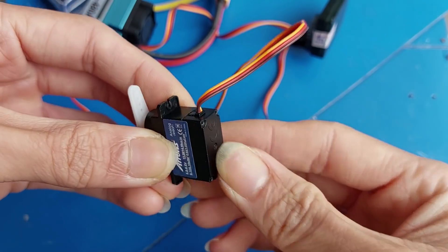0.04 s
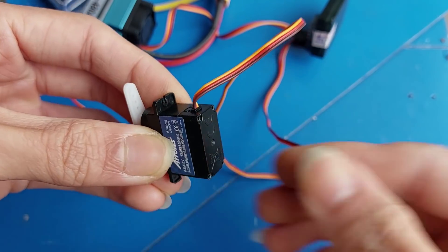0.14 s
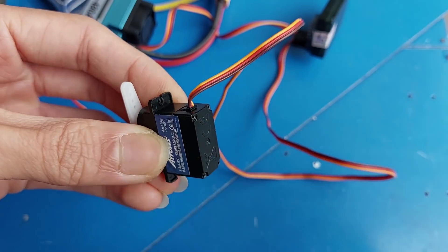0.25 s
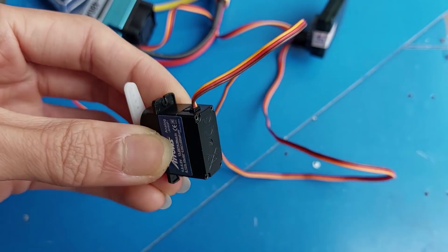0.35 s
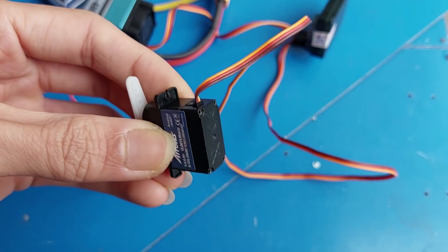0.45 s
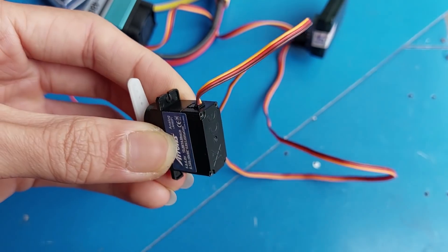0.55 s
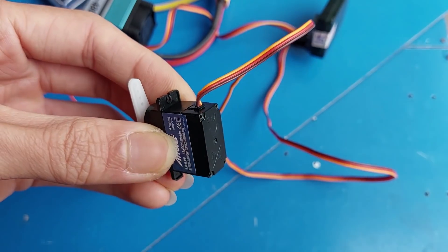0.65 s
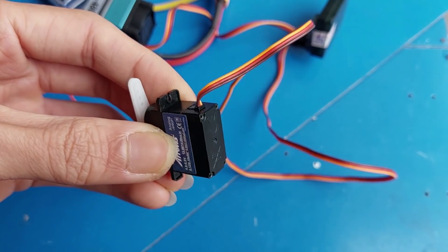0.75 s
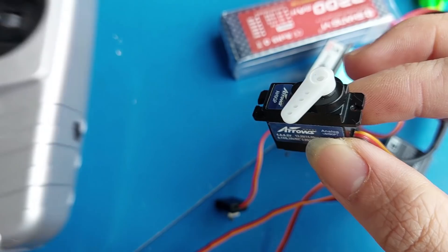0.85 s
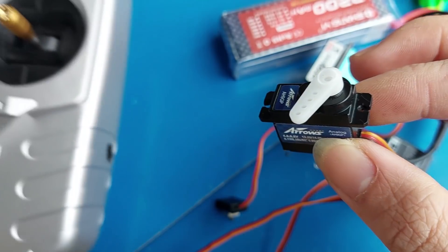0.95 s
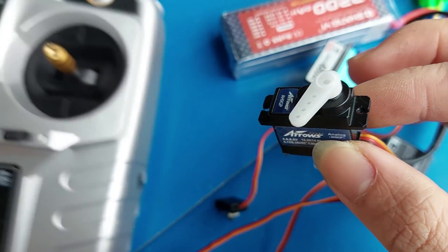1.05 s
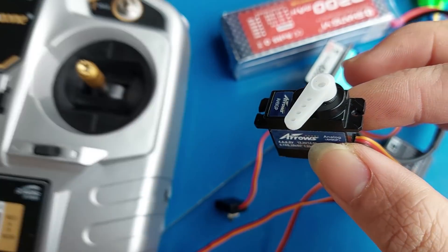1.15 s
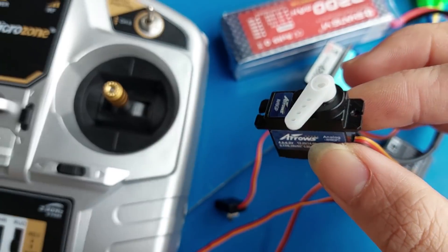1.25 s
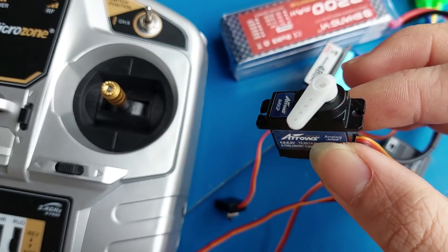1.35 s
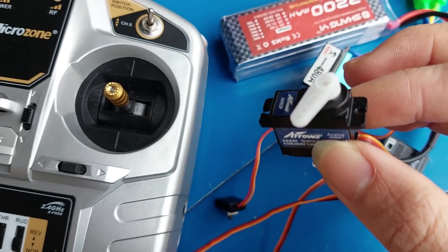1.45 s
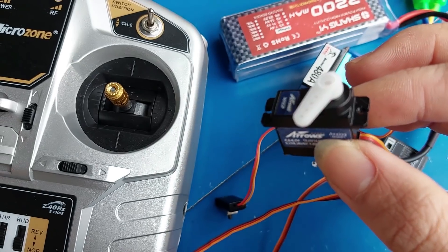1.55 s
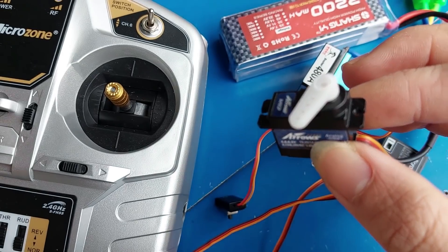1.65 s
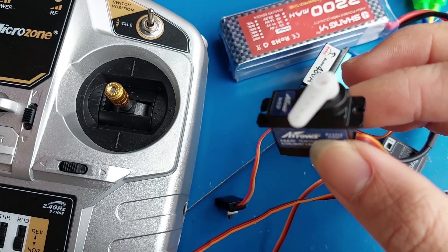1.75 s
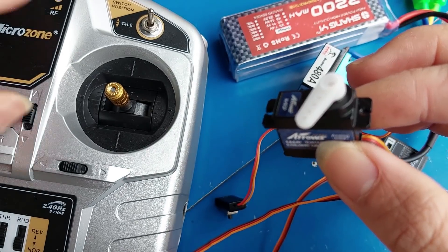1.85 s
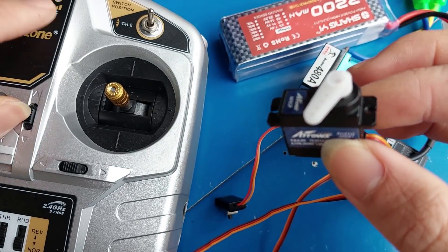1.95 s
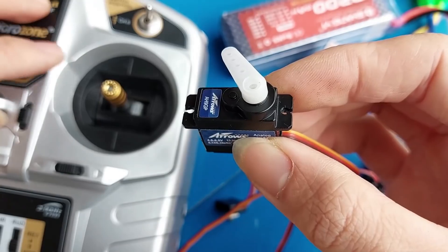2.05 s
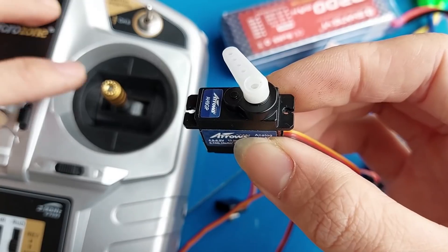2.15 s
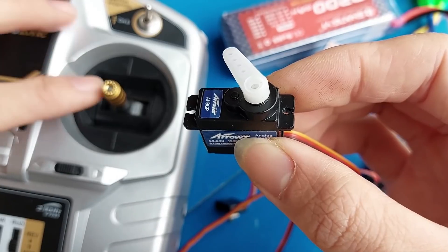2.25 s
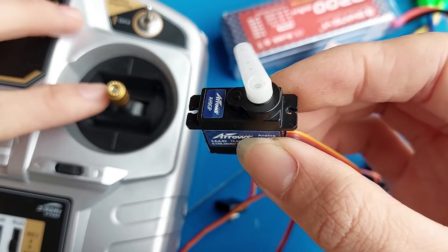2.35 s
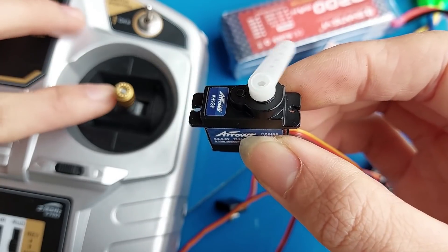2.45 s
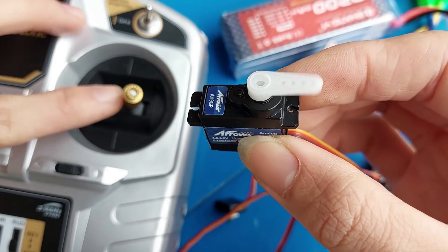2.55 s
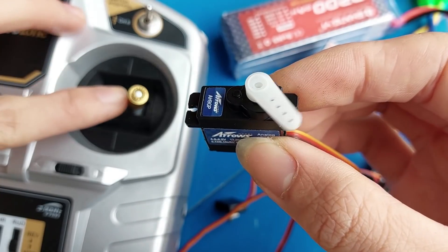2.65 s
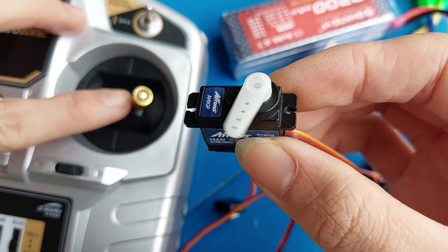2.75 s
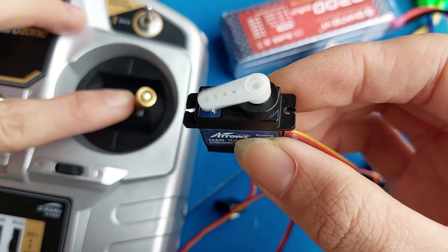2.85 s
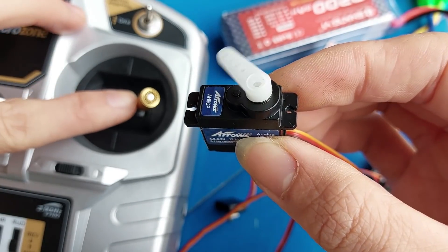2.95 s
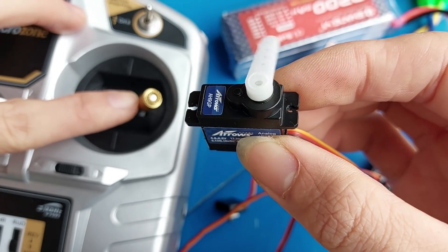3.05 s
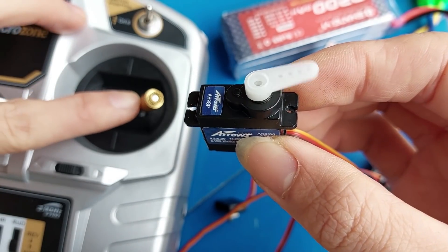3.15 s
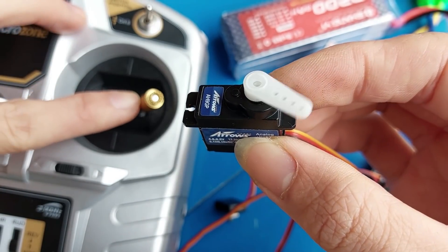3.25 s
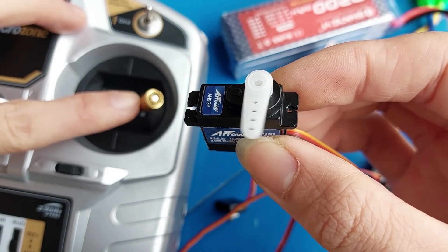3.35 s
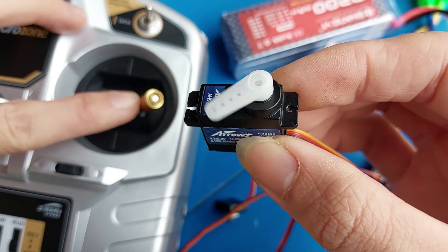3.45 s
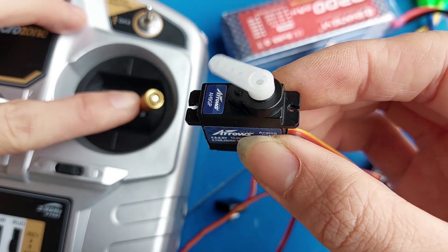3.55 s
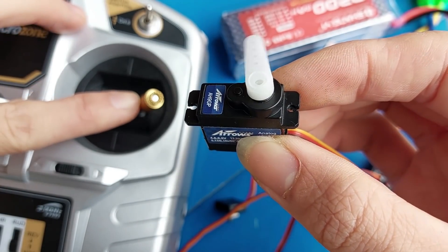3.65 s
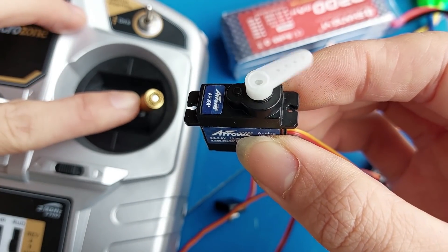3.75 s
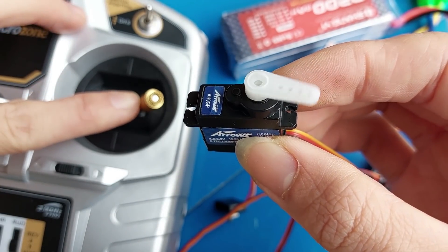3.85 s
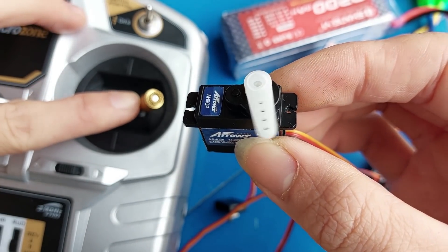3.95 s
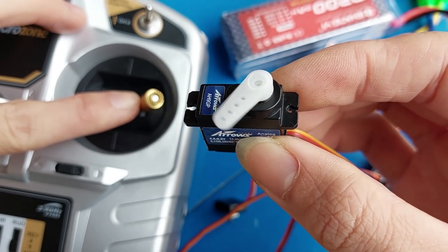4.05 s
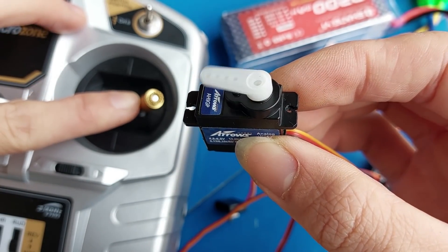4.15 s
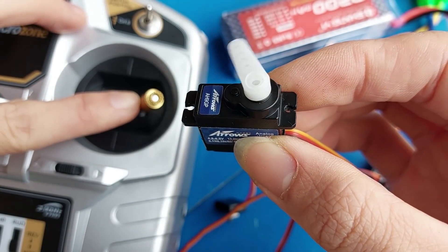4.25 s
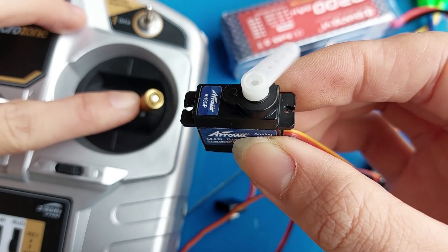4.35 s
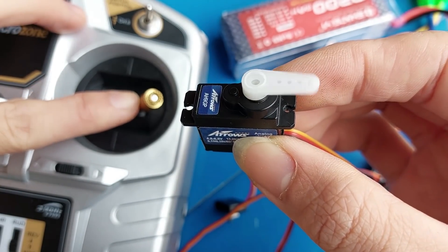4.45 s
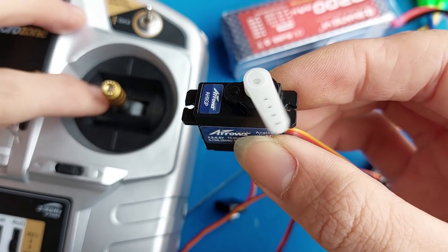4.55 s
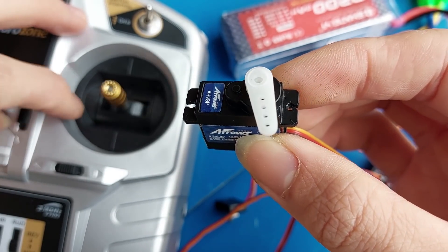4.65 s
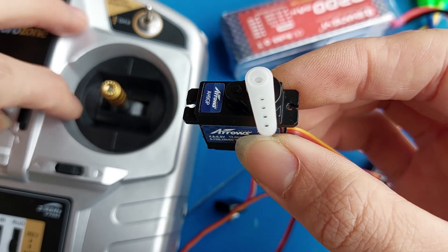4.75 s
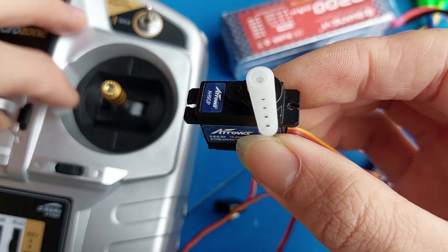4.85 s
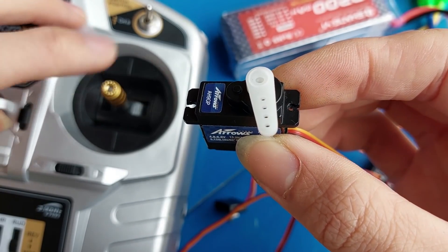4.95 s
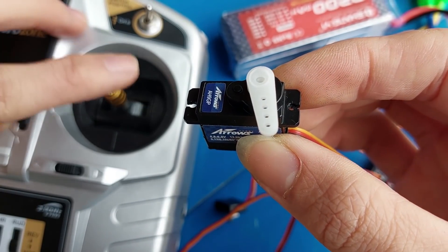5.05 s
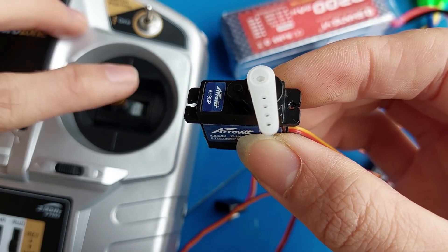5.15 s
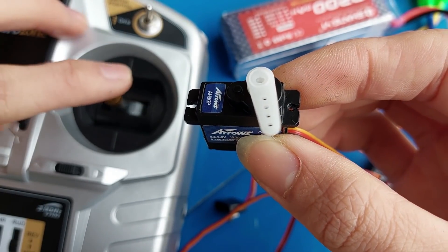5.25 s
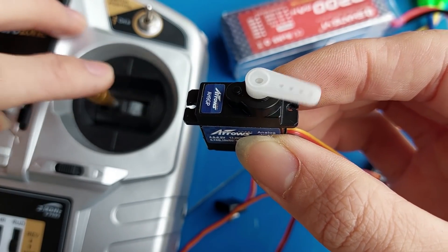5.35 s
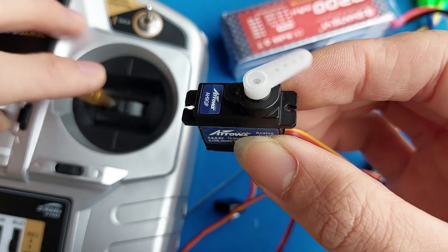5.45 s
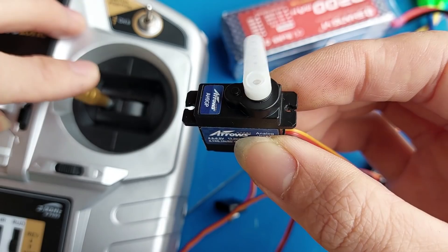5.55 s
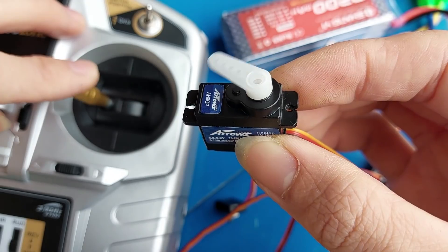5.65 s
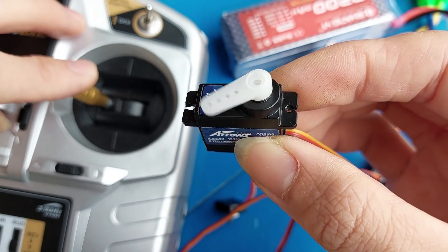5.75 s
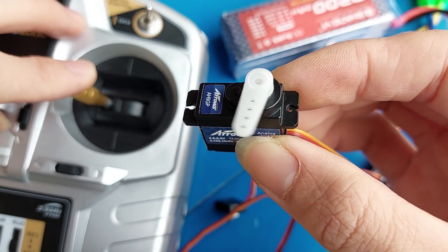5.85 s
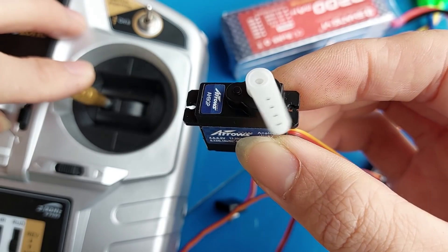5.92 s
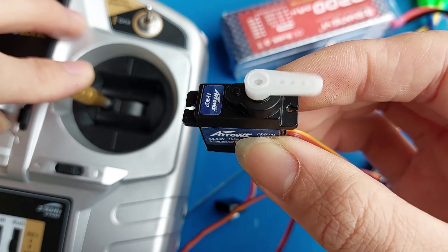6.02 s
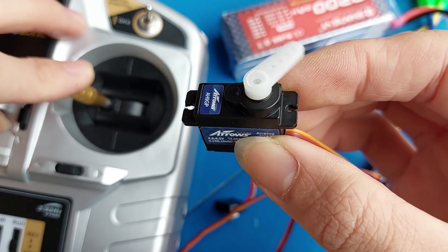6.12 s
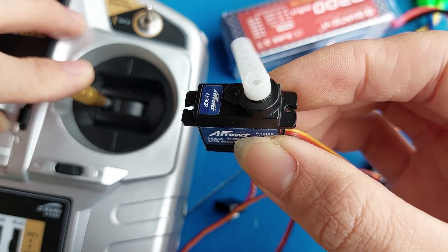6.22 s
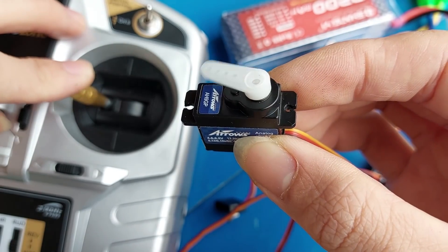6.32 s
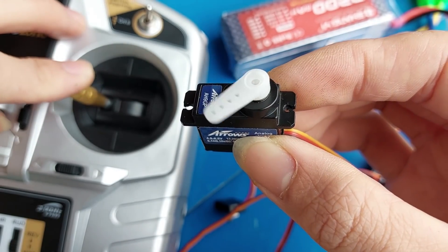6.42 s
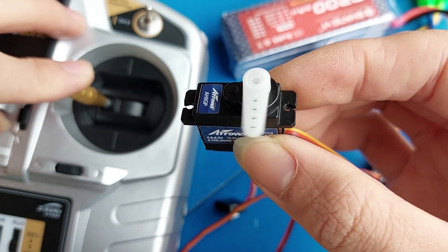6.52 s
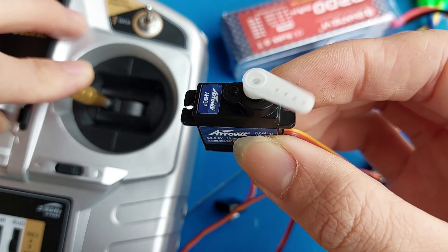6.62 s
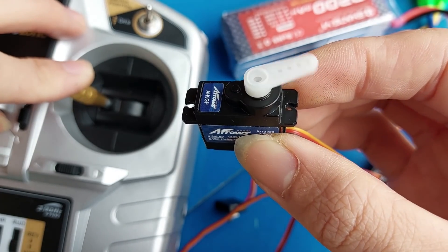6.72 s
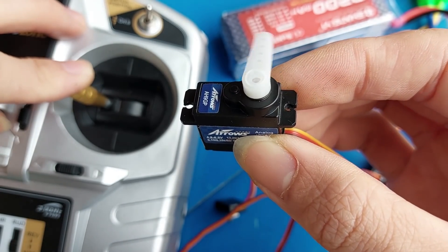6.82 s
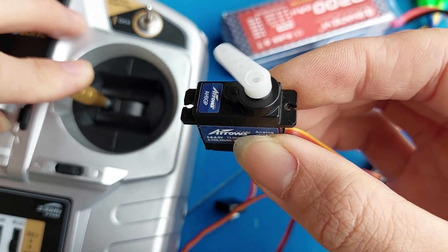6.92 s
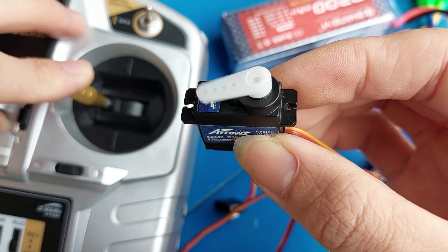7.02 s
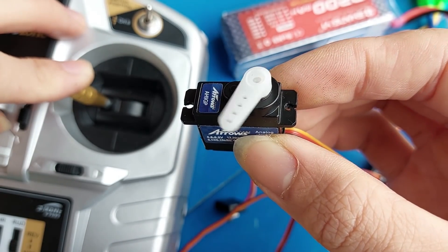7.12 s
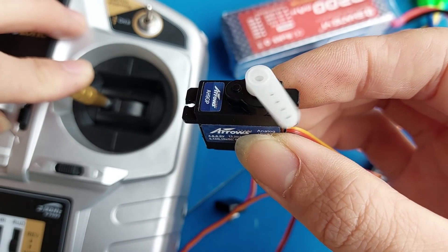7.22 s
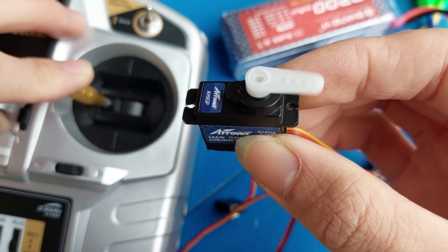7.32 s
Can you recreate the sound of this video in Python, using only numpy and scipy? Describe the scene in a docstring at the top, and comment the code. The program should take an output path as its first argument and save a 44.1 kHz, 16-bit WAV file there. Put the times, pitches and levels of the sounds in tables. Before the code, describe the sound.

Faint room hiss, a brief dropout, plastic knocks and small clicks, then two long buzzy runs of a tiny geared motor close to the microphone.

```python
"""Quiet room throughout: rumble and hiss that swell at times, with faint narrow whistles and a far gliding chirp.
At 0.75 s a short silent gap, after which the room noise is coloured anew. From 0.95 s a hollow plastic
transmitter is set down on the bench (ringing modes, cracks), drags, rocks to rest; its stick clicks.
At 2.35 s a small servo near a two-port microphone runs one way, stops at 4.63 s as clicks recur, and from
5.28 s runs back to the end: its three-slot motor and gears whine on shaft multiples over pulsing gear hiss."""
import sys
import numpy as np
from scipy import signal
from scipy.fft import rfft, irfft, next_fast_len
from scipy.io import wavfile
from scipy.ndimage import uniform_filter1d

SR = 44100
rng = np.random.default_rng(int(sys.argv[2]) if len(sys.argv) > 2 else 0)


def digitize_waveform(pressure):
    """Quantize a signal to 16-bit integers and store it at the path in sys.argv[1].

    Rows of a 2-D input are taken as channels; values are limited to [-1, 1].
    """
    field = np.atleast_2d(pressure).T
    bounded = np.clip(field, -1, 1)
    quanta = np.round(bounded * 32767).astype(np.int16)
    wavfile.write(sys.argv[1], SR, quanta)


def elevation(decibels):
    """Turn decibel levels (scalar or array-like) into linear amplitude ratios."""
    levels = np.asarray(decibels, float)
    return 10 ** (levels / 20)


N = 325458
M = next_fast_len(N)
T = np.arange(N) / SR
HZ = np.arange(M // 2 + 1) * SR / M
SHORT_T = T[:SR // 4]

# room rumble, before and after the gap: [f/Hz, relative level/dB per Hz]
RUMBLE = [
    [(15, -42), (25, -15.5), (102, -6), (140, -13.5), (319, -22.5), (358, -15), (389, -21.5), (437, -21),
     (779, -32), (1300, -26), (1690, -49), (2860, -120)],
    [(15, -53.5), (25, -23.5), (53, -10.5), (91, -4), (149, 0.5), (179, -4), (237, -6.5), (270, -10),
     (376, -8.5), (437, -12), (628, -15.5), (860, -20), (1300, -23.5), (1690, -49.5), (2860, -120)],
]
# room hiss, before and after the gap: [f/Hz, relative level/dB per Hz]
HISS = [
    [(760, -29), (1300, -4), (1860, -11), (2660, -7), (3350, -16), (5600, -17), (6420, -18), (7590, -17),
     (16000, -19)],
    [(1300, -3.5), (1650, 1), (2200, -8.5), (2900, -8.5), (3800, -14.5), (5500, -22), (8500, -17.5),
     (9500, -13), (11200, -16.5), (13000, -17), (15500, -18)],
]
# likeness of the room noise at the two ports: [f/Hz, likeness/0-1]
PORT_LIKENESS = [(60, .55), (130, .62), (290, .45), (640, .28), (1400, .05)]
# swells of the room noise: [t/s, length/s, rumble gain/dB, hiss gain/dB, treble gain/dB]
SWELLS = [(.08, .58, 2.6, 4.7, 10.8), (.76, 1.1, 7, 4, 4), (1.748, 0.83, 4.9, 8, 6.6),
          (4.93, 0.28, 0.033, 1.9, 4)]
# silent gap: [fade-out start t/s, silent from t/s, silent to t/s, fade-in end t/s]
GAP = (.747, .752, .831, .838)
# faint narrow hisses: [t/s, length/s, f/Hz, level/dB before port balance]
WHISTLES = [(0.16, 0.42, 2700, -79.5), (2.03, 0.2, 1640, -72), (5.03, .22, 1870, -78),
            (5.067, 0.12, 2880, -83)]
# far chirp notes: [t/s, length/s, nominal first f/Hz, nominal last f/Hz, mean level/dB]
CHIRP = [(0.468, 0.014, 4650, 4200, -57.5), (.484, 0.016, 3750, 5100, -57), (0.498, 0.025, 5050, 4880, -63),
         (0.53, .012, 5500, 6640, -68), (0.537, .046, 6550, 5250, -73), (.87, .06, 3350, 3250, -84),
         (.978, .028, 9000, 7450, -80), (1.005, .05, 3250, 3000, -79), (1.52, .02, 4900, 4750, -69),
         (1.045, 0.052, 5200, 5000, -79), (1.923, .04, 5070, 4830, -83), (1.989, .03, 5300, 4900, -80)]
# transmitter blows: [t/s, relative knock level/dB, thud over knock/dB, crack over knock/dB, left over right/dB]
KNOCKS = [(.951, -67.5, 8, -14, 3), (1.1301, -15.5, -11.5, -1.5, 4), (1.1384, -26, 6, -23.5, 2.5),
          (1.1487, -28.5, 7.5, -14.5, 1.5), (1.1885, -34, 5.5, -17.5, -1.5), (1.234, -9, -16, 0, 1.5),
          (1.254, -22.5, -8.5, -16, -4.5), (1.2966, -6.5, -13.5, -9, 4), (1.3054, -14.5, -12, -7.5, 2.5),
          (1.3165, -31, -7, -14, 5.5), (1.3537, -31.5, 9, -22, 3), (1.3593, -11, -12, -2, 0),
          (2.3065, -54.5, 4, -6, 3), (4.608, -40, -5.5, -24, 5.5)]
# modes of the hollow case on the bench: [nominal f/Hz, nominal relative level/dB, t60/s]
CASE_MODES = [(298, -1, 0.098), (410.4, -3, 0.057), (528, 1.5, 0.058), (650, -3.5, 0.08), (769, -1, .07),
              (873, -0.5, 0.062), (1040, -6.5, 0.045), (1160, -5.5, .04), (1320, -10.5, .04),
              (1360, -10, 0.021), (1610, -4, 0.031), (1752, -3, 0.026), (1930, -7, 0.018),
              (2140, -7, 0.048), (2483, -2, 0.034), (2636, 0.5, 0.024), (2690, -9, .025)]
# crack of plastic on the bench: [f/Hz, relative level/dB per Hz]
CRACK = [(800, -33.5), (2500, -8.5), (3400, 1), (4600, 2), (6000, 1.5), (7500, -7.5), (9500, -12),
         (12000, -20), (16000, -22)]
# case dragging on the bench: [t/s, pressure as level/dB]
DRAG = [(1.136, -37.5), (1.2, -43), (1.23, -38), (1.26, -33), (1.29, -37.5), (1.35, -47.5), (1.38, -43),
        (1.41, -60.5), (1.47, -57.5)]
# rocking and stick clicks: [t/s, relative level/dB, main ring f/Hz, crack over ring/dB]
TICKS = [(1.4835, -53, 1800, -6), (1.5036, -48, 1850, -12), (1.5426, -25.5, 1710, -17),
         (1.5582, -33, 1520, -26), (1.6056, -31, 1700, -20.5), (1.648, -35.5, 1670, -22),
         (1.6711, -40, 1610, -22), (1.699, -44.5, 1680, -23), (1.737, -40, 1580, -35.5),
         (1.7613, -45.5, 1620, -27), (1.8018, -45.5, 1610, -26), (1.821, -52, 1740, -20),
         (1.935, -43.5, 1720, -9.5), (1.9492, -40, 1650, -28), (2.0186, -49, 2060, -21),
         (2.0283, -39.5, 1930, -23), (2.2749, -37, 1910, -17), (2.3317, -29, 1970, -15),
         (2.3442, -28.5, 1890, -14.5), (4.6337, -27, 1970, -15)]
# slot tone of each run, dipping where the gears bind: [t/s, nominal f/Hz]
SLOT_TONES = [
    [(2.47, 1869), (2.77, 1865), (2.85, 1823), (2.95, 1875), (3.55, 1852), (3.67, 1875), (3.97, 1885),
     (4.01, 1849), (4.28, 1884), (4.42, 1914), (4.62, 1916)],
    [(5.37, 1854), (5.51, 1826), (5.7, 1860), (5.76, 1821), (5.87, 1831), (5.96, 1790), (6.05, 1870),
     (6.17, 1832), (6.36, 1838), (6.45, 1797), (6.53, 1822), (7.04, 1815), (7.16, 1782), (7.28, 1859),
     (7.37, 1842)],
]
# each run: [start t/s, spin-up time/s, stop t/s, level fall time/s, right-port lag/s, nominal rough band/dB per Hz]
DRIVE = [(2.35, .075, 4.626, 0.016, .00042, -100), (5.281, .042, 9.0, .009, 0.0001464, -86)]
# shaft multiples, run forward: [multiple, left nominal level/dB, right nominal level/dB, left lead/rad]
FORWARD_TONES = [(1, -78, -91, -0.3), (2, -94, -99, 3.1), (3, -49, -58, -1.3), (4, -72, -80, -1.4),
                 (5, -84, -74, -2.5), (6, -60, -63, 2.7), (7, -65, -66, -0.1), (8, -67, -72, -0.2),
                 (9, -61, -71, 0.5), (10, -59, -76, -0.9), (11, -67, -70, 0.8), (12, -58, -67, -0.1),
                 (13, -52, -58, -0.6), (14, -55, -69, -1.5), (15, -56, -72, -2.0), (16, -59, -65, -0.1),
                 (17, -60, -67, -2.3), (18, -62, -64, 2.7), (19, -56, -61, -1.4), (20, -47, -51, 0.7),
                 (21, -54, -64, -0.1), (22, -48, -58, -0.4), (23, -51, -52, -0.0), (24, -51, -65, 0.5),
                 (25, -54, -69, 1.6)]
# shaft multiples, run back: [multiple, left nominal level/dB, right nominal level/dB, left lead/rad]
BACK_TONES = [(1, -86, -82, -0.0), (2, -94, -97, 2.1), (3, -46, -55, -0.3), (4, -65, -71, -1.2),
              (5, -69, -68, -0.1), (6, -57, -68, -2.7), (7, -56.5, -56.5, 0.0), (8, -67, -84, 0.3),
              (9, -54.5, -65.5, -1.5), (10, -60, -65, -0.1), (11, -62, -60, 0.7), (12, -61, -69, 0.6),
              (13, -53, -57, -0.2), (14, -55, -67, -1.1), (15, -58, -68, -1.1), (16, -57, -62, -1.6),
              (17, -61, -61, -0.7), (18, -58, -65, -2.8), (19, -64, -59, -0.1), (20, -57, -55, -0.3),
              (21, -50, -68, -0.2), (22, -47, -62, -2.3), (23, -54, -64, -2.6), (24, -48, -55, 0.6),
              (25, -65, -69, 0.6)]
# gear hiss through the case, run forward: [f/Hz, left relative level/dB per Hz, right relative level/dB per Hz]
FORWARD_MESH = [(1100, -99, -104), (1600, -93, -92), (2200, -90, -106), (2750, -83, -95), (3300, -93, -93),
                (3700, -88, -91), (4300, -87, -87), (5000, -86, -94), (5700, -87, -92), (6300, -83, -86),
                (6900, -80, -85), (7400, -81, -88), (8100, -79, -83), (9000, -81, -89), (9800, -84, -86),
                (10500, -82, -84), (11400, -81, -80), (12000, -77, -80), (12600, -71, -75),
                (13200, -72, -81), (13700, -68, -79), (14100, -73, -78), (14600, -76, -80),
                (15200, -75, -80), (15700, -78, -84)]
# gear hiss through the case, run back: [f/Hz, left relative level/dB per Hz, right relative level/dB per Hz]
BACK_MESH = [(1100, -99, -101), (1600, -91, -90), (2200, -99, -106), (2750, -85, -86), (3300, -87, -88),
             (3700, -86, -93), (4300, -86, -86), (5000, -85, -93), (5700, -86, -90), (6300, -84, -87),
             (6900, -80, -85), (7400, -82, -85), (8100, -78, -81), (9000, -79, -86), (9800, -80, -81),
             (10500, -80, -82), (11400, -79, -76), (12000, -76, -77), (12600, -70, -80), (13200, -68, -80),
             (13700, -70, -80), (14100, -71, -78), (14600, -68, -76), (15200, -70, -79), (15700, -78, -84)]

RUMBLE_DB, HISS_DB, WANDER_DB = -68, -80.5, 1.2  # room at rest, before port balance
FIRST_HISS_DB = 5  # extra hiss below the treble, before the gap
LOW_HZ, TREBLE_HZ, HISS_TOP_HZ = 1300, 2950, 15600
PORT_TURN_RAD = 1.3  # between ports, shared room noise
SWELL_EDGE_S = 0.11
RUN_RUMBLE_DB, RUN_RUMBLE_EDGE_S = 6, 0.073  # bass raised while the motor runs
WHISTLE_WIDTH_HZ = 90
TICK_SPREAD_RAD = 1.2  # between ports
RASP_DB, SCUFF_DB = -5.5, -13  # upper case modes and treble, re drag rumble
SLOTS = 3
GEAR_RATIO = .094
SLOT_RING_HZ, SLOT_RING_WIDTH_HZ = 1875, 92  # slot-tone resonance: peak, offset to 3 dB down
LOAD_DB_PER_HZ, FREE_SPEED_S = 0.0474, 0.34  # gain per Hz of tone below its mean over this time
TOOTH_PLAY_RAD, FLICKER_DB = .65, 2.2
ROOM_T60_S = .2
TOP_HZ, TOP_EDGE_HZ = 15820, 120


def along(hz, value):
    """Read a spectrum on a log frequency axis."""
    return np.interp(np.log(HZ + 1), np.log(hz), value)


def colour(x, gain):
    """Filter by a gain per frequency."""
    return irfft(rfft(x, M) * gain, M)[..., :N]


def unit(x):
    """Scale to rms 1."""
    return x / np.sqrt(np.mean(x ** 2))


def walk(rate_hz):
    """Random values at rate_hz, joined by straight lines."""
    count = int(T[-1] * rate_hz) + 2
    return np.interp(T * rate_hz, np.arange(count), rng.standard_normal(count))


def gate(start_s, length_s, edge_s):
    """Rise, hold and fall between 0 and 1."""
    return np.clip(np.minimum(T - start_s, start_s + length_s - T) / edge_s, 0, 1)


def add(out, start_s, x):
    """Mix a short sound in at start_s."""
    i = int(start_s * SR)
    out[:, i:i + x.shape[1]] += x


def room():
    """Wandering rumble, hiss and treble; the right port hears the shared part turned in phase."""
    likeness = np.clip(along(*np.transpose(PORT_LIKENESS)), 0, .99)
    low, treble = HZ < LOW_HZ, HZ > TREBLE_HZ
    swell_db = sum(np.array(gain_db)[:, None] * gate(s, length_s, SWELL_EDGE_S)
                   for s, length_s, *gain_db in SWELLS)
    running = sum(gate(start, stop + RUN_RUMBLE_EDGE_S - start, RUN_RUMBLE_EDGE_S)
                  for start, _, stop, *_ in DRIVE)
    before_gap = T < GAP[1]
    top = 1 / (1 + (HZ / HISS_TOP_HZ) ** 60)
    rumble_db = RUMBLE_DB + np.maximum(swell_db[0], RUN_RUMBLE_DB * running)
    hiss_db = HISS_DB + swell_db[1] + FIRST_HISS_DB * before_gap
    treble_db = HISS_DB + swell_db[2]
    # tables, level, band passed, band whose rms is the reference
    layers = [(RUMBLE, rumble_db, low, 1),
              (HISS, hiss_db, ~low & ~treble, ~low),
              (HISS, treble_db, treble * top, ~low)]
    out = np.zeros((2, N))
    for tables, db, band, whole in layers:
        level = elevation(db + WANDER_DB * walk(12))
        for table, part in zip(tables, [before_gap, ~before_gap]):
            shape = elevation(along(*np.transpose(table)))
            gain = band * shape / np.sqrt(np.mean((whole * shape) ** 2))
            shared, own = rng.standard_normal((2, N))
            left = colour(shared, gain)
            right = colour(shared, gain * likeness * np.exp(1j * PORT_TURN_RAD))
            right += colour(own, gain * np.sqrt(1 - likeness ** 2))
            out += part * level * np.array([left, right])
    return out * elevation([[4.5], [-.5]])


def whistles():
    """Narrow bands of noise that swell and fade."""
    out = np.zeros((2, N))
    for s, length_s, hz, db in WHISTLES:
        band = np.exp(-((HZ - hz) / WHISTLE_WIDTH_HZ) ** 2)
        noise = unit(colour(rng.standard_normal((2, N)), band))
        out += noise * elevation(db) * gate(s, length_s, .04)
    return out * elevation([[2.5], [-2.5]])


def chirp():
    """Thin wavering notes with a faint octave; each glides and fades."""
    out, waver = 0, 1 + .015 * walk(200)
    for s, length_s, first_hz, last_hz, db in CHIRP:
        hz = np.interp(T, [s, s + length_s], [first_hz, last_hz]) * waver
        turn = 2 * np.pi * np.cumsum(hz) / SR
        note = np.sin(turn) + 0.05 * np.sin(2 * turn)
        out = out + note * elevation(db + 2.3 * walk(149.2)) * gate(s, length_s, .004)
    return out


def ring(modes, phases):
    """Decaying sines, a quarter second long."""
    t = SHORT_T
    return sum(elevation(db - 60 * t / t60) * np.sin(2 * np.pi * hz * t + phase)
               for (hz, db, t60), phase in zip(modes, phases))


def case(thud_db, knock_db):
    """One blow: bass reaches both ports alike, higher modes with port phases apart."""
    chance = rng.standard_normal((len(CASE_MODES), 4))
    modes = []
    for (hz, db, t60), (detune, lift) in zip(CASE_MODES, chance[:, :2]):
        blow_db = thud_db if hz < 1300 else knock_db
        modes.append((hz * (1 + 0.027 * detune), db + 3.1 * lift + blow_db, t60))
    apart = chance[:, 2] * np.clip(np.array(CASE_MODES)[:, 0] / 1790.0, 0, 3) ** 2
    phase = chance[:, 3]
    pair = [ring(modes, phase + apart / 2), ring(modes, phase - apart / 2)]
    return 0.37 * np.array(pair) * np.minimum(SHORT_T / 0.00068, 1)


def crack(db, t60):
    """Short noise burst in the colour of the plastic, unrelated at the two ports."""
    t = SHORT_T
    hz = np.arange(SR // 8 + 1) * 4.
    crack_hz, crack_db = np.transpose(CRACK)
    gain = elevation(np.interp(np.log(hz + 1), np.log(crack_hz), crack_db))
    noise = unit(irfft(rfft(rng.standard_normal((2, len(t)))) * gain, len(t)))
    return noise * elevation(db + 2.5 - 60 * t / t60) * np.minimum(t / 0.0022, 1)


def drag():
    """Gritty friction noise drives the damped case modes and the plastic's treble."""
    s, press_db = np.transpose(DRAG)
    grit = rng.standard_normal(N) * elevation(3.0 * walk(200))
    damp = elevation(-60 * SHORT_T / 0.0074)  # bench and hand damp the sliding case
    touch = np.interp(T, [s[0] - .004, s[0], s[-1], s[-1] + 0.1], [0, 1, 1, 0])
    rumble, rasp, scuff = case(0, -60.5) * damp, case(-69, 0) * damp, crack(0, 0.0012)
    out = np.zeros((2, N))
    for db, body in [(0, rumble), (RASP_DB, rasp), (SCUFF_DB, scuff)]:
        rub = unit(signal.fftconvolve(grit[None], body, axes=1)[:, :N])
        out += rub * elevation(np.interp(T, s, press_db) + db) * touch
    return out


def transmitter():
    """Blows excite case modes and cracks, then a drag; rocking and the stick ring small modes."""
    out = np.zeros((2, N))
    for s, db, thud_db, crack_db, pan_db in KNOCKS:
        blow = case(db + thud_db, db) + crack(db + crack_db, 0.012)
        add(out, s, blow * elevation([[pan_db / 2], [-pan_db / 2]]))
    for s, db, hz, crack_db in TICKS:
        modes = [(0.376 * hz, db - 12.5, .03), (0.667 * hz, db - 13.5, .02), (0.8 * hz, db - 14, .016),
                 (hz, db, .018), (1.16 * hz, db - 0.5, .016), (1.67 * hz, db - 10.5, .014)]
        left = 0.94 * ring(modes, np.zeros(len(modes)))
        right = 0.42 * ring(modes, rng.uniform(-TICK_SPREAD_RAD, TICK_SPREAD_RAD, len(modes)))
        click = np.array([left, right]) * np.minimum(SHORT_T / 0.0005, 1)
        add(out, s, click + crack(db + crack_db, 0.0156))
    return out + drag()


def servo(curve, drive, tones, mesh):
    """Shaft multiples with a gear sideband, over hiss pulsing with the turning shaft and gear."""
    s, slot_hz = np.transpose(curve)
    start, rise, stop, fall, lag_s, rough_db = drive
    after_stop = np.clip(T - stop, 0, 1)
    speed = (1 - np.exp(-(np.clip(T - start, 0, 1) / rise) ** 2.5)) * np.exp(-after_stop / .08)
    power = speed * np.exp(-after_stop / fall)
    tone_hz = np.interp(T, s, slot_hz)
    shaft_hz = tone_hz / SLOTS * speed * (1 + .0012 * walk(35))
    turn = 2 * np.pi * np.cumsum(shaft_hz) / SR
    slot_gain = elevation(1.1) / np.sqrt(1 + ((tone_hz - SLOT_RING_HZ) / SLOT_RING_WIDTH_HZ) ** 2)
    free_hz = uniform_filter1d(tone_hz, int(FREE_SPEED_S * SR))
    load_gain = elevation(LOAD_DB_PER_HZ * (free_hz - tone_hz))
    on, usual_hz = power > 1e-5, slot_hz.mean() / SLOTS
    mesh_hz, *mesh_db = np.transpose(mesh)
    out = np.zeros((2, N))

    for (k, *db, lead), phase in zip(tones, rng.uniform(0, 2 * np.pi, (len(tones), 2))):
        loose = k != SLOTS  # slot tone is clean; tooth play makes the others flicker and blur
        gain = load_gain[on] * elevation(FLICKER_DB * walk(25)[on] + 1.0) if loose else slot_gain[on]
        swell = gain * speed[on] ** 7.2
        angle = (k * turn + loose * TOOTH_PLAY_RAD * walk(150))[on] + phase[0]
        for ear in range(2):
            # a tone swells as it drifts into a case resonance
            case_db = np.interp(k * shaft_hz[on], mesh_hz, mesh_db[ear])
            case_db = case_db - np.interp(k * usual_hz, mesh_hz, mesh_db[ear])
            a = angle - ear * lead
            sideband = np.sin(a + GEAR_RATIO * turn[on] + phase[1])  # eccentric gear
            wave = np.sin(a) + loose * 0.25 * sideband
            out[ear, on] += np.sqrt(2) * elevation(db[ear] + loose * case_db) * swell * wave

    teeth = 1 + 0.055 * np.cos(turn) + 0.15 * np.cos(2 * turn)
    teeth += 0.068 * np.cos(3 * turn) + 0.06 * np.cos(4 * turn)
    teeth = unit(teeth * (1 + 0.16 * np.cos(GEAR_RATIO * turn)) * elevation(1.1 * walk(40)))
    both, left, right = rng.standard_normal((3, N)) * teeth * load_gain
    share = .6  # power fraction common to both ports
    late = colour(both, np.exp(-2j * np.pi * HZ * lag_s))
    low_cut = HZ ** 2 / (HZ ** 2 + 1000.0 ** 2)
    for ear, (common, own) in enumerate([(both, left), (late, right)]):
        gain = low_cut * np.sqrt(SR / 2) * elevation(along(mesh_hz, mesh_db[ear]) + 2.5)
        out[ear] += colour(np.sqrt(share) * common + np.sqrt(1 - share) * own, gain)

    # a narrow band of rough, wavering noise near 2.9 kHz while the motor runs
    rough = rng.standard_normal(N) * elevation(3.6 * walk(90)) * load_gain
    band = np.exp(-((HZ - 2880) / 220) ** 2)
    out += colour(rough, np.sqrt(SR / 2) * elevation(rough_db) * band)
    return out * power


def echo(x, t60, wet_db):
    """Add a short diffuse tail, independent at each port."""
    t = T[:SR // 2]
    tail = rng.standard_normal((2, len(t))) * elevation(-60 * t / t60) * np.minimum(t / 0.015, 1)
    tail = signal.lfilter([.5], [1, -.5], tail)
    tail /= np.sqrt((tail ** 2).sum(1))[:, None]
    return x + elevation(wet_db) * signal.fftconvolve(x, tail, axes=1)[:, :N]


def scene():
    """Transmitter and servo in a small room, with chirp and whistles."""
    background = room() + whistles() + chirp()
    blows = colour(transmitter(), HZ ** 4 / (HZ ** 4 + 104.0 ** 4))  # the blows carry no deep bass
    motor = servo(SLOT_TONES[0], DRIVE[0], FORWARD_TONES, FORWARD_MESH)
    motor += servo(SLOT_TONES[1], DRIVE[1], BACK_TONES, BACK_MESH)
    return background + echo(blows, ROOM_T60_S, -20.5) + echo(motor, ROOM_T60_S, -19)


def roll_off(x):
    """The treble ends steeply here."""
    return signal.sosfilt(signal.butter(12, 16680, fs=SR, output="sos"), x)


def record(dry):
    """Cut the top and silence the short gap."""
    edge = np.clip((TOP_HZ - HZ) / TOP_EDGE_HZ + .5, 0, 1)
    top_cut = np.sin(np.pi / 2 * edge) ** 2
    mix = np.array([colour(ear, top_cut) for ear in dry])
    return roll_off(mix * np.interp(T, GAP, [1, 0, 0, 1]))


dry = scene()
out = record(dry)
digitize_waveform(out)
```